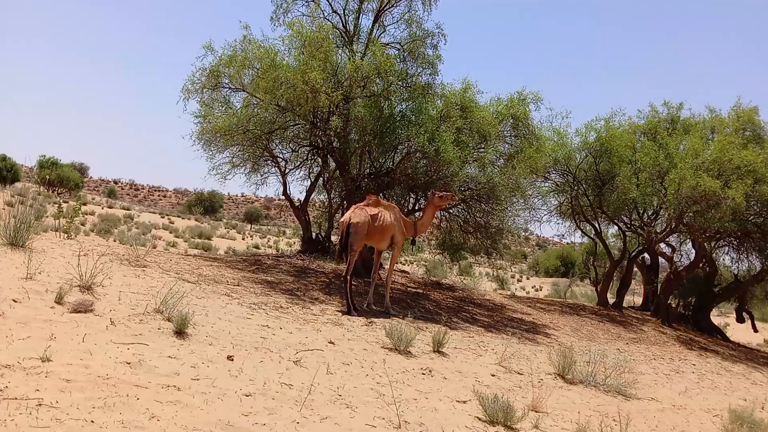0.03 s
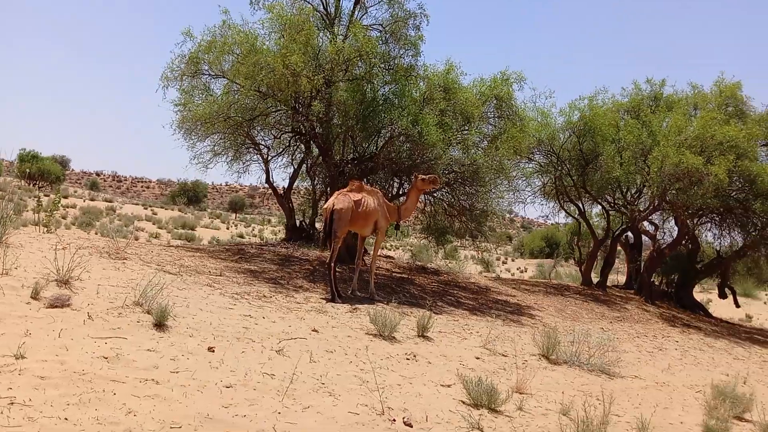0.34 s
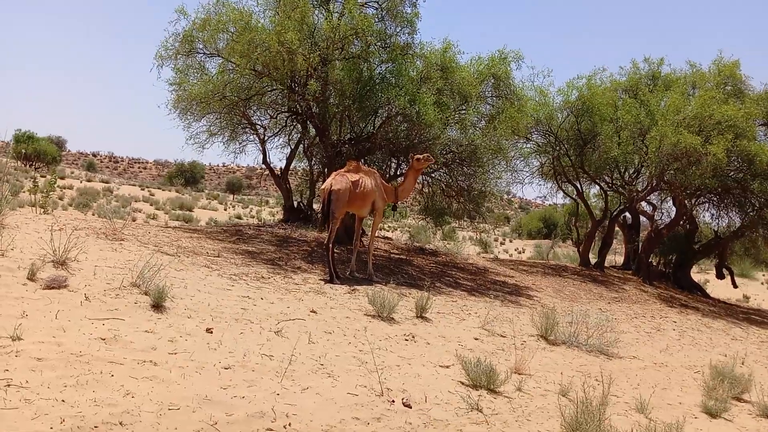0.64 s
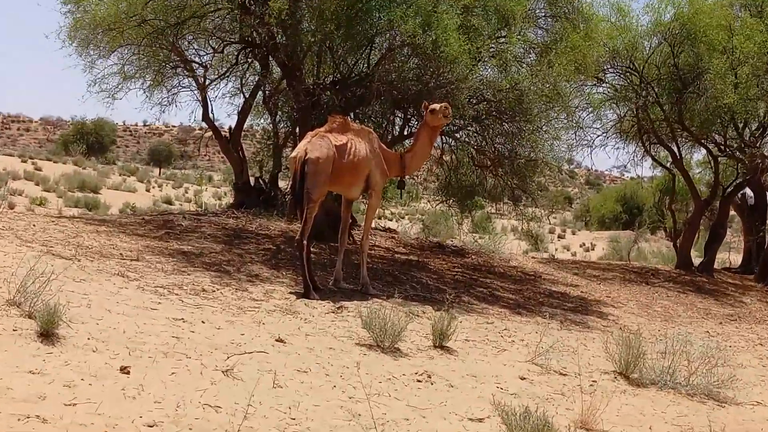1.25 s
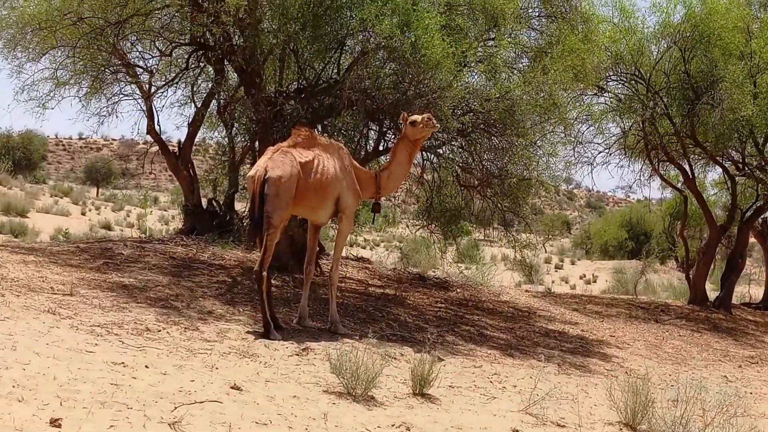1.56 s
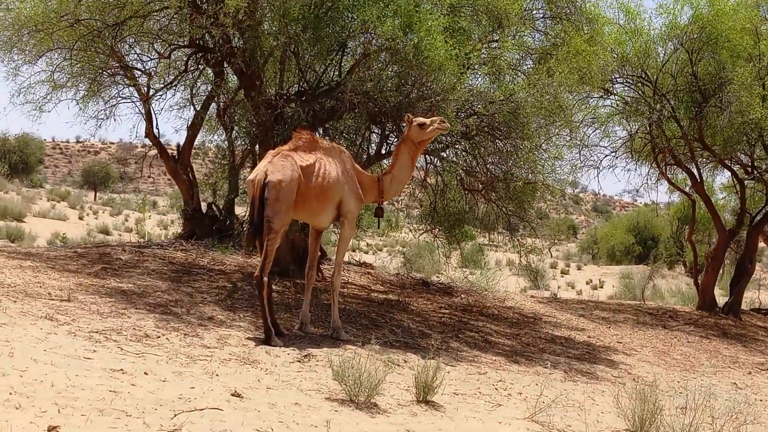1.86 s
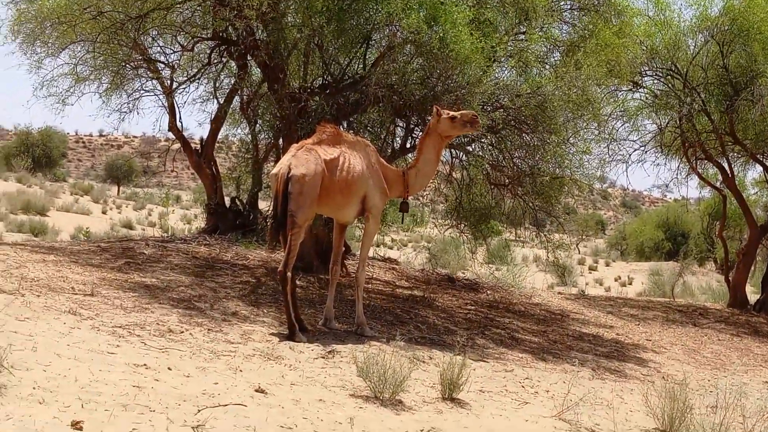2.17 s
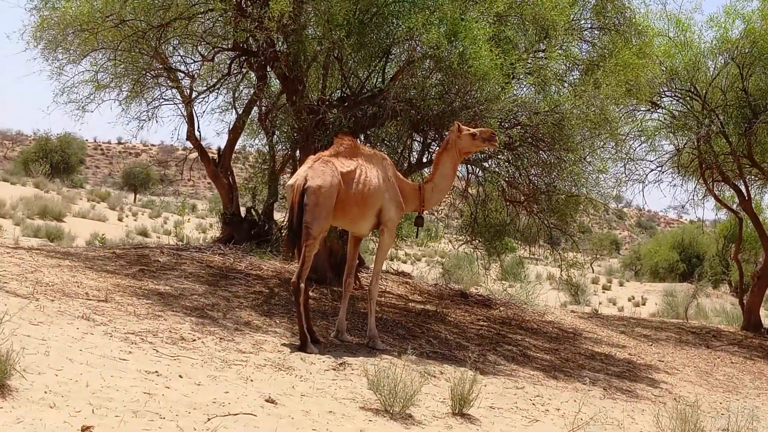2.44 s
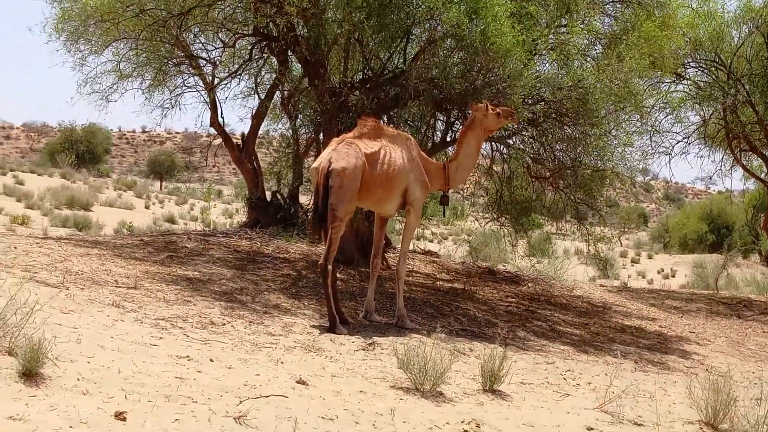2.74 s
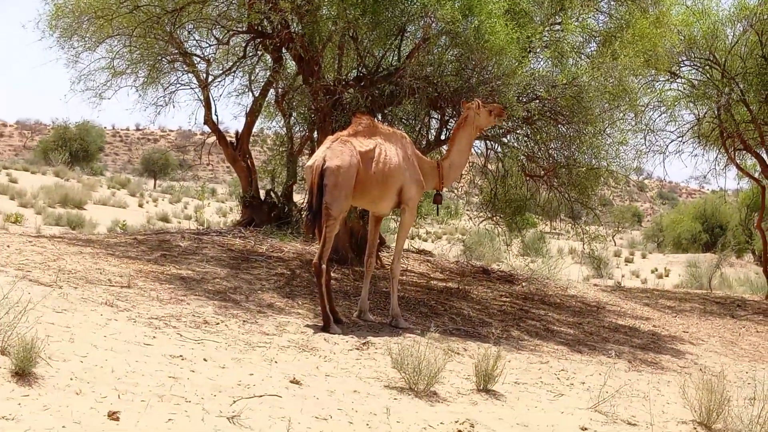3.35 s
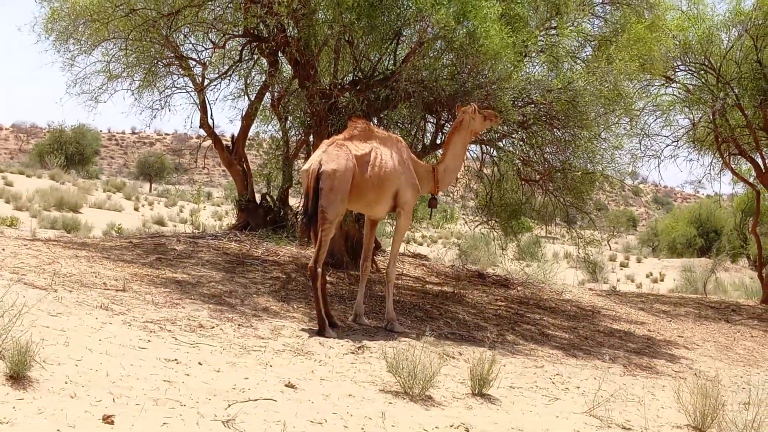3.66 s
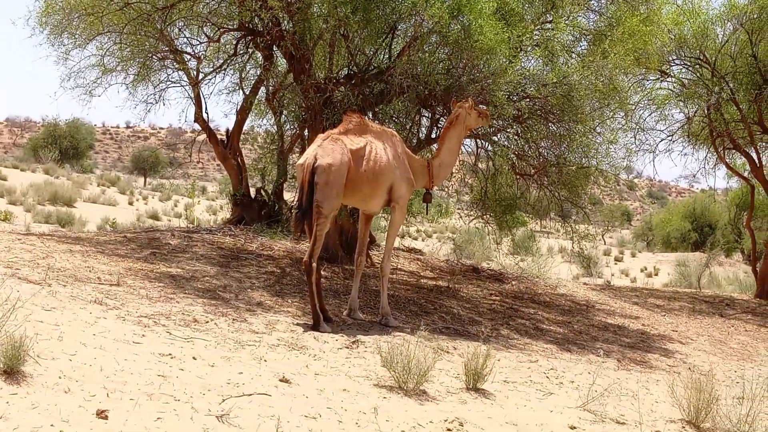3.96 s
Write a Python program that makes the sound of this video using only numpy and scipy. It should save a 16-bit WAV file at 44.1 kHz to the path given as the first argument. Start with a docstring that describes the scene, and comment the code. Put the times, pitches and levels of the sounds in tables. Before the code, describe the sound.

Short, high bird chirps and two rising whistles come from trees in a quiet desert. Close, louder clicks and a brief rub of camera handling interrupt them, while faint coos sound far off and light gusts buffet the microphone.

```python
"""Small birds whistle and chirp in desert trees, with a faint far cooing, perhaps a dove.
Each call is one gliding tone, scattered by branches and leaves. Fingers click on a hand-held
camera, making its shell ring, and rub its case with a grainy hiss. Light gusts rumble on the
microphone, and quiet air lies under it all."""
import sys
import numpy as np
from scipy import signal
from scipy.fft import rfft, irfft
from scipy.io import wavfile
from scipy.ndimage import uniform_filter1d

SR = 44100
rng = np.random.default_rng(int(sys.argv[2]) if len(sys.argv) > 2 else 0)


def log_audio(samples):
    """Write samples as a 16-bit WAV file to the path given in sys.argv[1]."""
    # one column per channel
    frames = np.atleast_2d(samples).T
    # limit to full scale, then quantise
    limited = np.clip(frames, -1, 1)
    pcm = np.round(limited * 32767).astype(np.int16)
    wavfile.write(sys.argv[1], SR, pcm)


N = 176400  # 4 seconds

# Two close whistles, a list of points for each: t/s, f/Hz, level/dB
WHISTLE_PATHS = [
    [(0.15, 4100, -91), (0.156, 3900, -74), (0.162, 4269, -67.5), (0.174, 4720, -63), (0.202, 4980, -59.5),
     (0.214, 5030, -53), (0.236, 5350, -62), (0.248, 5570, -59.5), (0.292, 5720, -83), (0.3, 5560, -86)],
    [(2.15, 3410, -77), (2.162, 3550, -75), (2.172, 3830, -64), (2.186, 4400, -54), (2.206, 4900, -56),
     (2.222, 5030, -50), (2.252, 5205, -49.5), (2.276, 5519, -59.5), (2.3, 5430, -96)],
]
def whistles(t, waver_hz=31, flutter_db=1.5, gain_db=-1):
    """A bird slides a pure tone upward; its pitch and loudness tremble slightly."""
    out = np.zeros(N)
    waver, flutter = waver_hz * wander(250), flutter_db * wander(170)
    for call in WHISTLE_PATHS:
        on = (t > call[0][0]) & (t < call[-1][0])
        hz = curve(call, t[on]) + waver[on]
        db = curve(call, t[on], column=2) + flutter[on] + gain_db
        out[on] += tone(hz) * undb(db)
    return out


# Farther chirps: start t/s, length/s, first f/Hz, last f/Hz, level/dB, rasp (0 is pure)
CHIRP_NOTES = [(.435, 0.035, 5700, 6230, -65.5, 0.75), (1.155, 0.033, 6100, 5900, -72.5, 0.45),
               (1.202, .07, 5200, 4110, -76.5, 0.34), (1.769, 0.035, 5800, 5950, -72, 0.76),
               (2.054, 0.039, 6170, 6220, -72, 0), (2.073, .016, 3350, 3050, -71.5, .05),
               (2.076, 0.043, 4200, 5280, -66, 1.1), (2.1, 0.027, 3600, 4800, -62, 0.2),
               (2.114, 0.037, 4630, 5540, -62.5, 0.73), (2.267, 0.018, 6500, 6380, -72, 0),
               (2.347, 0.02, 6000, 5800, -72, 0.94), (3.068, .028, 5500, 5470, -75, 0),
               (3.157, 0.047, 4500, 5010, -66, 0.1), (3.182, 0.033, 2400, 2335, -71.5, 0),
               (3.246, .07, 6000, 5500, -71.5, 0.18), (3.33, 0.014, 4200, 4600, -70.5, 0),
               (3.347, 0.054, 3950, 4690, -65.5, 0.23), (3.398, .028, 6200, 5830, -69, 0.9),
               (3.464, .05, 5600, 5520, -75.5, .5), (3.491, 0.117, 2300, 2177, -74, 0.34),
               (3.534, 0.024, 6070, 5980, -65, 1.0), (3.571, .064, 4600, 4870, -68, .08),
               (3.662, .065, 6550, 5480, -72.5, .35), (3.792, 0.017, 6200, 6000, -71.5, 0.8),
               (3.805, 0.053, 4750, 4936, -64.5, 0.15), (3.95, 0.05, 6300, 5670, -71, 1)]
def chirps(t, gain_db=-1.6):
    """Small birds give short, high notes, some clear and some buzzy."""
    return undb(gain_db) * glides(t, CHIRP_NOTES)


# Far coos: start t/s, length/s, first f/Hz, last f/Hz, level/dB, rasp (0 is pure)
COO_NOTES = [(.69, 0.054, 738, 754, -73.5, 0.1), (.83, 0.059, 628, 685, -69.5, 0.04),
             (.89, 0.12, 763, 815, -75, 0), (.99, .07, 555, 532, -72.5, 0.08),
             (1.045, 0.054, 626, 730, -69.5, 0.13), (1.26, 0.089, 669, 765, -70.5, 0.1),
             (1.35, 0.039, 680, 676, -70.5, 0.02), (1.46, 0.051, 632, 672, -71.5, 0),
             (1.94, 0.093, 805, 830, -77.5, 0.02), (2.73, 0.067, 705, 750, -78, 0.02),
             (3.14, .12, 682, 765, -74, 0.06), (3.55, .08, 707, 685, -76.5, 0)]
def coos(t):
    """A far bird, perhaps a dove, gives soft, low notes."""
    return glides(t, COO_NOTES)


def glides(t, notes, bend=1.7, rasp_hz=650):
    """Each note slides in pitch and levels off; rasp shakes the pitch into a buzz."""
    out = np.zeros(N)
    shake = rasp_hz * wander(670)
    for start, length, first_hz, last_hz, db, rasp in notes:
        on = (t > start) & (t < start + length)
        progress = (t[on] - start) / length
        hz = last_hz + (first_hz - last_hz) * np.abs(1 - progress) ** bend
        out[on] += tone(hz + rasp * shake[on]) * swell(progress, edge=0.25) * undb(db)
    return out


def birds(t, echo_s=0.13, echo_db=-7.5):
    """All the calls, plus a brief echo as they bounce off branches and leaves."""
    song = whistles(t) + chirps(t) + coos(t)
    scatter = rng.standard_normal(N) * np.exp(-np.log(1000) * t / echo_s)  # falls 60 dB in echo_s
    scatter /= np.sqrt(np.sum(scatter ** 2))
    return song + undb(echo_db) * signal.fftconvolve(song, scatter)[:N]


# The tones the camera's shell rings at, its hollow first: f/Hz, width/Hz, level/dB
SHELL_TONES = [(530.0, 380.0, -9.1), (1710.0, 1040.0, -13.7), (2830.0, 970.0, -1.8), (5660.0, 2370.0, -8.0),
               (12190.0, 3350.0, -14.6), (14470.0, 1130.0, -12.8)]
# Finger clicks: t/s, peak level/dB, sharpness f/Hz, extra level of the hollow/dB
FINGER_CLICKS = [(0.1009, -39.0, 3400.0, 2), (0.189, -46.8, 800.0, 4), (0.3296, -20.1, 3200.0, 5),
                 (0.5363, -20.8, 3000.0, 6), (0.796, -41.3, 1700.0, -13), (0.8075, -41.7, 1900.0, -16),
                 (0.9571, -38.4, 2800.0, 11), (1.11493, -11.5, 13200.0, -8), (1.11566, -18.7, 3400.0, -4),
                 (1.1159, -14.3, 2800.0, -15), (2.348, -42.5, 1100.0, -5), (2.369, -45.3, 1100.0, 0),
                 (2.433, -46.3, 800.0, 2), (2.483, -52.5, 1400.0, 0), (2.5066, -14.0, 4400.0, 5),
                 (2.5098, -36.6, 6200.0, 3), (2.519, -46.1, 20700.0, -7), (2.59, -38.5, 2100.0, -2),
                 (2.621, -46.6, 900.0, 2), (2.64261, -33.1, 3200.0, 7), (2.64359, -38.8, 1800.0, -2),
                 (2.84481, -11.1, 15400.0, 0), (2.84579, -21.3, 1700.0, -6), (2.878, -44.9, 1000.0, -2),
                 (2.885, -48.6, 900.0, 2), (2.905, -45.6, 1100.0, 2), (2.92, -40.9, 1100.0, 6),
                 (2.96206, -29.8, 5100.0, 5), (2.96304, -28.9, 1300.0, -12)]
def clicks(size=2048):
    """A finger knocks the shell, which rings very briefly; a soft touch leaves out the high tones."""
    out = np.zeros(N + size)
    s = 1j * np.arange(size // 2 + 1) * SR / size  # frequencies, in the form the filters need
    hollow, *panels = [undb(db) * s * width / (s * s + s * width + hz ** 2)
                       for hz, width, db in SHELL_TONES]
    low_cut = s / (s + 170)
    for start, db, sharp_hz, hollow_db in FINGER_CLICKS:
        shell = undb(hollow_db) * hollow + sum(panels)
        touch = 1 / (1 + np.sqrt(2) * s / sharp_hz + (s / sharp_hz) ** 2) ** 2
        ring = irfft(shell * touch * low_cut, size)
        i = int(start * SR)
        out[i:i + size] += undb(db) * ring / np.abs(ring).max() * np.linspace(1, 0, size)
    return out[:N]


# One firm brush of a finger: t/s, level/dB
BRUSH_LEVEL = [(.3, -83), (.325, -57), (.35, -52), (.372, -51.5), (.395, -59.5), (.43, -68.5), (.48, -75)]
# Lighter slides of the grip: start t/s, length/s, level/dB
GRIP_SLIDES = [(0.75, .23, -69.5), (.98, 0.21, -74), (2.394, .035, -62), (2.57, 0.1, -66),
               (2.873, 0.055, -69.5)]
# The mix of low and high sound in the brush and in the slides: f/Hz, level/dB
BRUSH_SPECTRUM = [(120, -45), (200, -12), (380, -16), (749, -6.5), (821, -14), (933, -7), (1080, -12),
                  (1500, -8.5), (2020, -0.5), (4270, -16.5), (6400, -10), (9400, -39.5), (16000, -22)]
SLIDE_SPECTRUM = [(200, -13), (800, -1), (2000, -3.5), (3200, -3), (4300, -14), (6500, -13.5), (9000, -28),
                  (13700, -25), (14800, -12), (16000, -9.5)]
def grip(t, grain_db=2.5):
    """Skin rubs on the case and makes a grainy hiss."""
    brushing = (t > BRUSH_LEVEL[0][0]) & (t < BRUSH_LEVEL[-1][0])
    brush = undb(curve(BRUSH_LEVEL, t)) * brushing
    slide = sum(undb(db) * swell((t - start) / length, edge=0.35) for start, length, db in GRIP_SLIDES)
    grain = unit(undb(grain_db * wander(400)))
    return grain * (brush * noise(BRUSH_SPECTRUM) + slide * noise(SLIDE_SPECTRUM))


# The strength of the gusts: t/s, level/dB
GUST_LEVEL = [(0, -120), (.1, -92), (.2, -64), (.25, -64), (.29, -65.5), (.4, -66.5), (.43, -61),
              (.47, -76), (1.19, -74.5), (1.24, -58.5), (1.35, -49.5), (1.48, -70.5), (1.505, -70),
              (1.525, -41.5), (1.55, -64), (1.63, -60), (1.8, -72), (2.07, -79), (2.13, -57.5),
              (2.19, -67.5), (2.26, -65), (2.31, -67), (2.4, -60.5), (2.48, -68.5), (2.53, -54.5),
              (2.55, -61.5), (2.65, -53), (2.7, -38.5), (2.73, -51.5), (2.81, -49.5), (2.85, -41.5),
              (2.93, -49), (2.97, -39.5), (3.01, -45.5), (3.055, -41.5), (3.08, -57), (3.2, -50.5),
              (3.29, -64), (3.38, -48.5), (3.49, -52.5), (3.53, -67), (3.57, -46), (3.61, -62),
              (3.65, -51.5), (3.75, -67), (3.868, -60.5), (3.888, -37), (3.93, -43.5), (4.0, -53.5)]
# The rumble of big and of small swirls of air: f/Hz, level/dB
BIG_SWIRLS = [(20, -37), (40, -15), (70, 0.5), (100, 1), (155, -3.5), (220, -14.5), (330, -27), (500, -32),
              (1000, -58), (3000, -80)]
SMALL_SWIRLS = [(60, -26), (150, -1), (250, 1), (340, -5), (500, -24), (1000, -35), (3000, -66)]
def wind(t, big_gain_db=2, small_gain_db=-8.5, small_growth=1.555, smooth_s=0.043):
    """Swirls of air beat on the microphone; the strongest gusts also shed smaller, higher ones."""
    big = noise(BIG_SWIRLS)
    power = uniform_filter1d(big ** 2, int(smooth_s * SR))
    power = uniform_filter1d(power, int(smooth_s * SR / 2))
    big /= np.sqrt(power)  # even out the rumble so the gusts set its loudness
    gust_db = curve(GUST_LEVEL, t)
    peak_db = gust_db.max()
    small_db = peak_db + small_gain_db + small_growth * (gust_db - peak_db)
    return big * undb(gust_db + big_gain_db) + noise(SMALL_SWIRLS) * undb(small_db)


# The mix of low and high sound in the background: f/Hz, level/dB
AIR_SPECTRUM = [(20, -7), (40, -11), (75, -1), (150, -2), (300, -2.5), (700, -9), (1400, -14.5),
                (3000, -15.5), (4300, -20.5), (6700, -20.5), (8300, -40.5), (9600, -40), (12300, -31),
                (13800, -33.5), (15200, -23.5), (16000, -28)]
# Its loudness over time: t/s, level/dB
AIR_LOUDNESS = [(0, -125), (.075, -115), (.11, -73), (.2, -69), (.4, -67), (1.1, -68), (1.5, -68),
                (2.6, -65.5), (4, -67.5)]
def air(t, waver_db=1.28):
    """Quiet open air and microphone hiss fade in and waver gently."""
    return noise(AIR_SPECTRUM) * undb(curve(AIR_LOUDNESS, t) + waver_db * wander(5.2))


def undb(db):
    """Turn decibels into a number to multiply by."""
    return 10 ** (np.asarray(db) / 20)


def unit(x):
    """Scale a signal to an average strength (rms) of 1."""
    return x / np.sqrt(np.mean(x ** 2))


def curve(rows, t, column=1):
    """Join the points of a table column with straight lines."""
    rows = np.array(rows, float)
    return np.interp(t, rows[:, 0], rows[:, column])


def noise(spectrum):
    """Noise of strength 1, shaped by points of f/Hz, level/dB."""
    hz, db = np.array(spectrum, float).T
    f = np.maximum(np.arange(N // 2 + 1) * SR / N, 1)
    gain = undb(np.interp(np.log(f), np.log(hz), db))
    return unit(irfft(rfft(rng.standard_normal(N)) * gain, N))


def wander(rate_hz):
    """A smooth random wobble of strength 1; a higher rate makes it quicker."""
    f = np.arange(N // 2 + 1) * SR / N
    return unit(irfft(rfft(rng.standard_normal(N)) * np.exp(-(f / rate_hz) ** 2), N))


def swell(progress, edge):
    """Rise, hold and fall as progress goes from 0 to 1."""
    return np.sin(np.pi / 2 * np.clip(np.minimum(progress, 1 - progress) / edge, 0, 1))


def tone(hz):
    """A pure tone of strength 1 that follows a pitch."""
    return np.sqrt(2) * np.sin(2 * np.pi * np.cumsum(hz) / SR)


def scene():
    """Birds, fingers, wind and air add up at one microphone."""
    t = np.arange(N) / SR
    return (birds(t) + clicks() + grip(t) + wind(t) + air(t))[None]


def record(dry):
    """The camera cuts the deepest rumble and the very highest hiss."""
    low_hz, top_hz = 36, 15900
    low_cut = signal.butter(2, low_hz, "high", fs=SR, output="sos")
    top_cut = signal.ellip(10, .2, 70, top_hz, fs=SR, output="sos")
    return signal.sosfilt(top_cut, signal.sosfilt(low_cut, dry))


dry = scene()
out = record(dry)
log_audio(out)
```